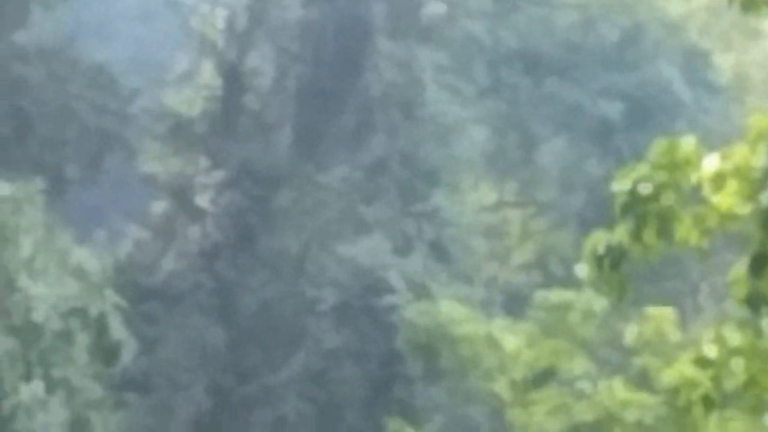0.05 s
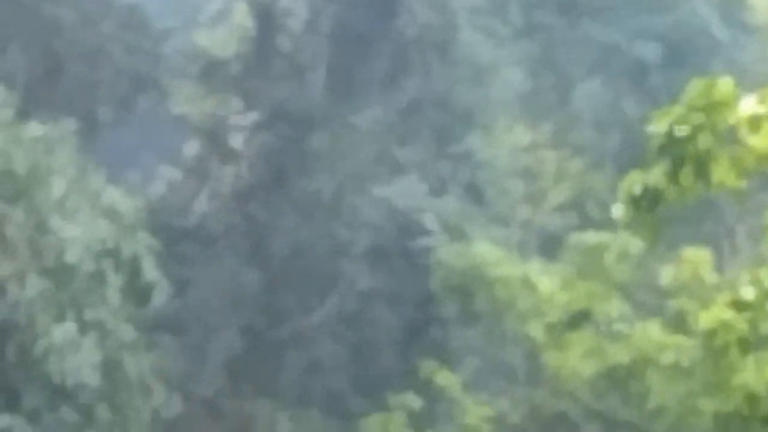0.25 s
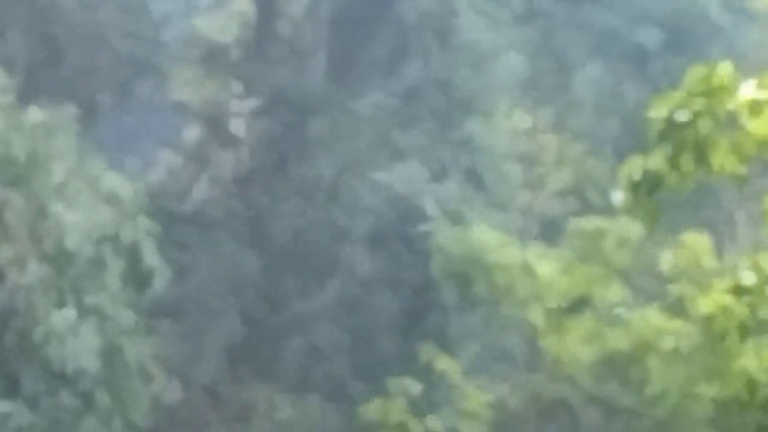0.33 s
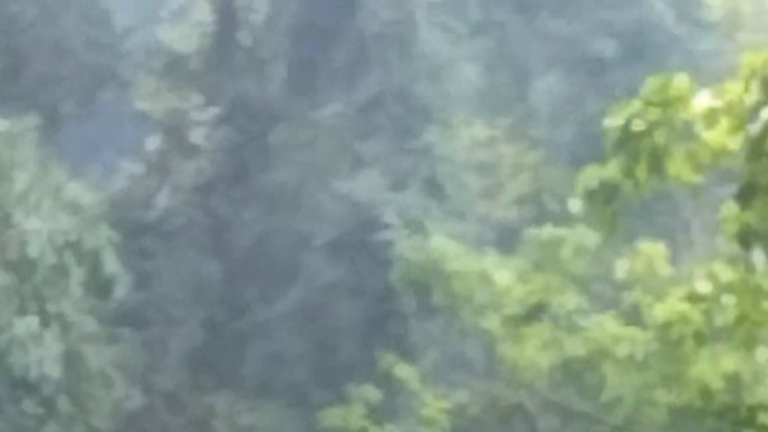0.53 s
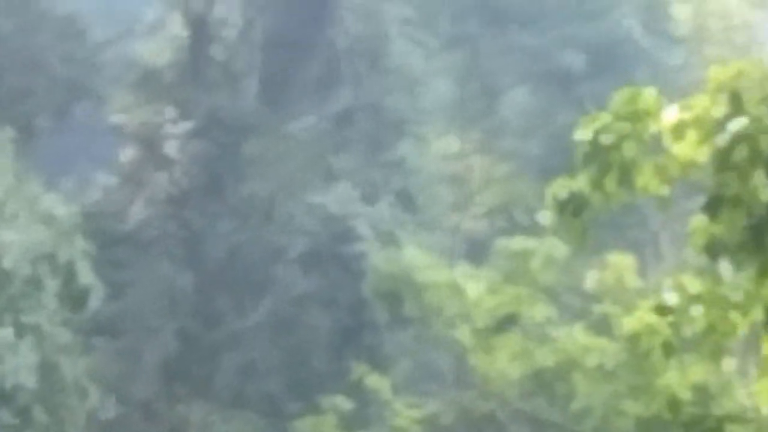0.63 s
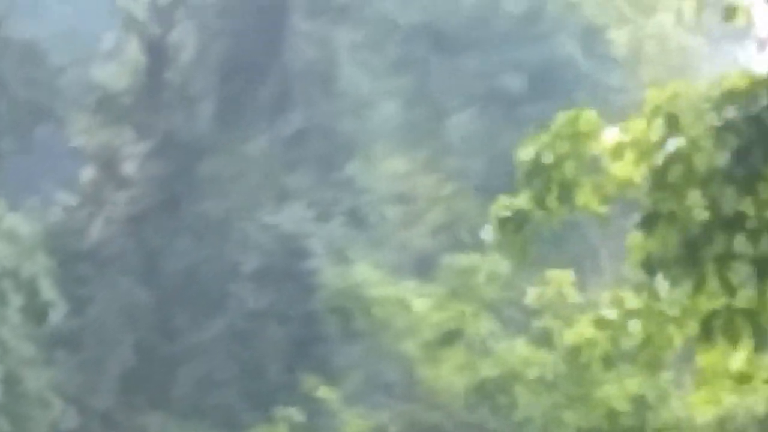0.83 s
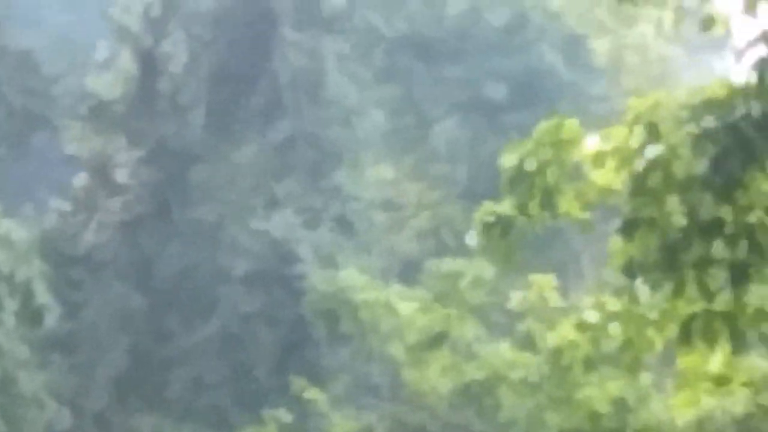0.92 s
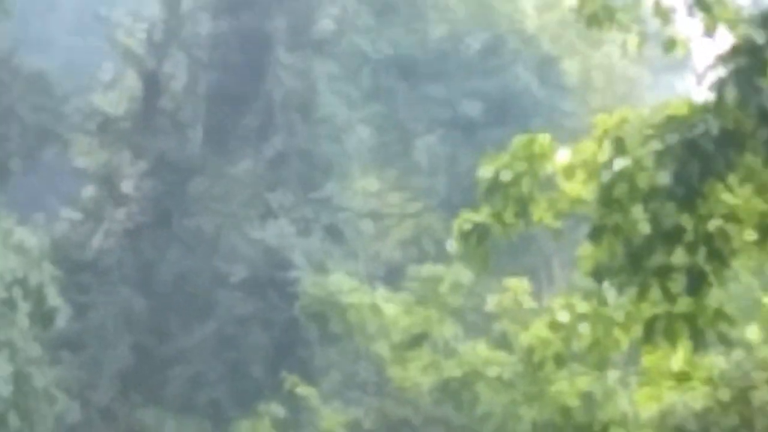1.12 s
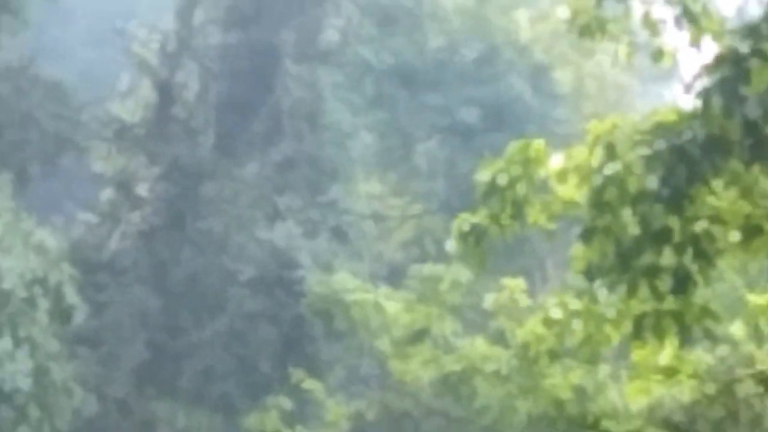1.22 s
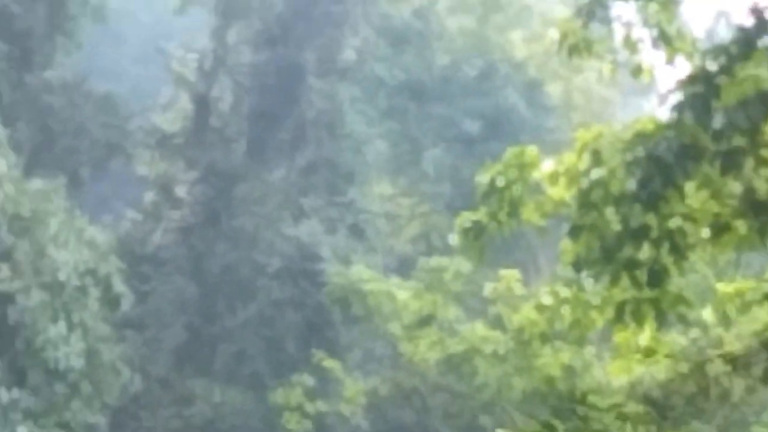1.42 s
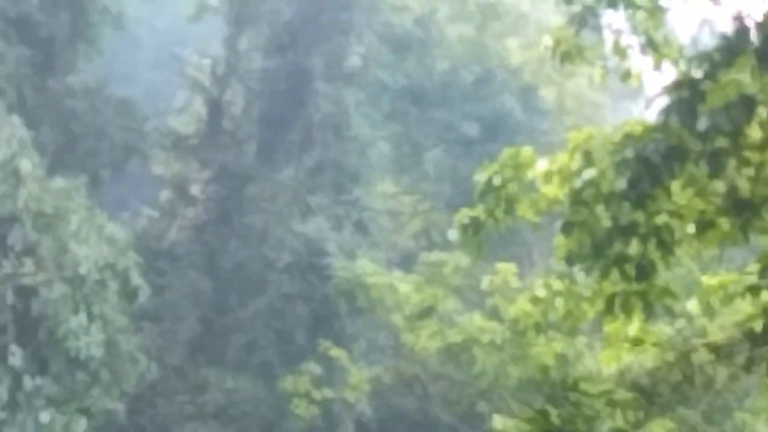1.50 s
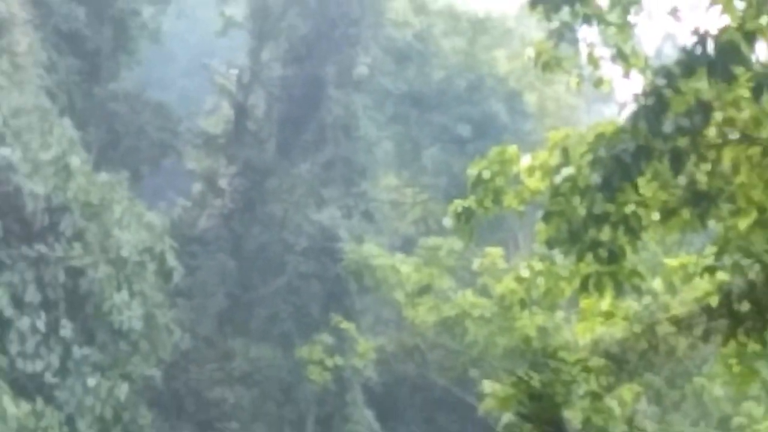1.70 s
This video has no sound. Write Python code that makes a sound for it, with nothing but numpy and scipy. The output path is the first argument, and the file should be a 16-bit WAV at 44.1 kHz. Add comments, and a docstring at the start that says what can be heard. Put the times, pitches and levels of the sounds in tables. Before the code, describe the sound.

One soft gibbon hoot rises among the trees, followed by two faint, thin bird chirps.

```python
"""A faint tick and rustle at the microphone, then a gibbon's soft, rising hoot from off in dense forest:
a nearly pure tone that echoes among the trunks, with a low knock under its start. Later a small bird
whistles two very high chirps from the trees to the right. Close by, all through, the hand-held camera
is rubbed in short strokes: friction gives a dry rustle, slips of the grip tick, and its body rumbles.
Still forest air lies behind it all, picked up by the camera's two microphones."""
import sys
import numpy as np
from scipy import signal
from scipy.fft import rfft, irfft
from scipy.io import wavfile
from scipy.ndimage import uniform_filter1d

SR = 44100
rng = np.random.default_rng(int(sys.argv[2]) if len(sys.argv) > 2 else 0)


def transcribe(u):
    """Save the signal u as a 16-bit wav file named by the first command-line argument.

    u: samples, shape (n,) or (channels, n), limited to [-1, 1]; the rate is SR.
    q: integer samples, one column per channel.
    """
    v = np.clip(np.atleast_2d(u).T, -1, 1)
    q = np.round(v * 32767).astype(np.int16)
    wavfile.write(sys.argv[1], SR, q)


N = 77175
T = np.arange(N) / SR
FREQS = np.fft.rfftfreq(N, 1 / SR)


# The hoot as it reaches the microphones through the trees, echoes included (time [s], level [dB])
HOOT_LEVEL = [(.08, -62.5), (.125, -35), (.15, -32), (.195, -36), (.215, -17.5), (.245, -22), (.3, -14),
              (.355, -11.5), (.39, -10), (.407, -19), (.432, -12), (.475, -20), (.51, -15.5), (.53, -21),
              (.545, -38.5), (.565, -27.5), (.615, -34.5), (.665, -43.5), (.715, -54.5), (.745, -39.5),
              (.79, -49.5), (.83, -61.5), (.88, -72)]
# Its octave, relative to the fundamental (time [s], level [dB])
OCTAVE_LEVEL = [(.12, -36.5), (.18, -22.5), (.225, -34.5), (.27, -45.5), (.34, -39), (.42, -34),
                (.55, -39.5)]

def gibbon_hoot():
    """Off in the trees, left: a slightly hoarse tone climbs and levels off; its echoes hang on."""
    start_s, top_s, voice_end_s = .072, .43, .54
    low_hz, top_hz, ceiling_hz, sag_hz_per_s = 277, 383.76, 386.5, 84
    climb_left = np.clip((top_s - T) / (top_s - start_s), 0, 1)
    hz = top_hz - (top_hz - low_hz) * climb_left ** 1.5 - sag_hz_per_s * np.clip(T - top_s, 0, .08)
    jitter = .006 * band(0, 120)
    echo_waver = .013 * (T > voice_end_s) * band(0, 90)  # overlapping echoes waver in pitch
    phase = 2 * np.pi * np.cumsum(hz * (1 + jitter + echo_waver)) / SR
    sounding = (T > HOOT_LEVEL[0][0]) & (T < HOOT_LEVEL[-1][0])
    level = uniform_filter1d(amp(curve(HOOT_LEVEL)) * sounding, size=400)
    lowpass = .5 - .5 * np.tanh((FREQS - ceiling_hz) / 9)
    fundamental = irfft(rfft(level * np.sin(phase)) * lowpass, N)
    octave = amp(curve(OCTAVE_LEVEL)) * np.sin(2 * phase + .25 * band(0, 120))
    hoarseness = amp(-33) * band(centre_hz=210, width_hz=70)
    hiss = amp(-37.5) * band(centre_hz=467, width_hz=440)
    voice = np.sqrt(2) * (fundamental + level * octave) + level * (hoarseness + hiss)
    return (voice + amp(-31) * forest_tail(voice, t60_s=.4, gap_s=.03)) * pan(4.8)


# The bird's two calls (time [s], level [dB], pitch factor [ratio])
CHIRPS = [(1.378, -39.5, 0.96), (1.428, -38, 0.95)]
# Contour that each call scales (time into the chirp [s], pitch [Hz], level [dB])
CHIRP_CONTOUR = [(0, 8060, -18), (.006, 9150, -13), (.013, 9700, -7), (0.025, 8800, -5.5),
                 (.036, 8490, -12.5), (0.047, 8260, -15)]
# Single reflections off trunks near the bird (delay [s], level [dB])
TRUNK_ECHOES = [(.0045, -10), (0.019, -18)]

def bird_chirps():
    """In the trees, right: thin whistles flick up and slide down; foliage scatters their lower part."""
    times, hz, db = np.transpose(CHIRP_CONTOUR)
    t = np.arange(0, times[-1], 1 / SR)
    phase = 2 * np.pi * np.cumsum(np.interp(t, times, hz)) / SR
    envelope = amp(np.interp(t, times, db)) * signal.windows.tukey(len(t), .1)
    direct = np.zeros(N)
    for start_s, level_db, ratio in CHIRPS:
        add(direct, start_s, np.sqrt(2) * amp(level_db) * envelope * np.sin(ratio * phase))
    dulled = signal.sosfilt(signal.butter(12, 8860, fs=SR, output="sos"), direct)
    out = direct + amp(4.5) * forest_tail(dulled, t60_s=.23, gap_s=.0093)
    for delay_s, echo_db in TRUNK_ECHOES:
        add(out, delay_s, amp(echo_db) * direct)
    return out * pan(-8)


def friction():
    """Hand on the camera: two noises, uneven in patches of time and pitch, flickering in level."""
    spectra = signal.stft(rng.standard_normal((2, N)), nperseg=256)[2]
    patches = uniform_filter1d(rng.standard_normal(spectra.shape[1:]), size=5, axis=0)
    patches = unit(uniform_filter1d(patches, size=7, axis=1))
    flicker = unit(uniform_filter1d(rng.standard_normal(spectra.shape[2]), size=2))
    return unit(signal.istft(spectra * amp(3.5 * patches + 1.46 * flicker), nperseg=256)[1][:, :N])


def tiny_slips(per_s=400, spread_db=4, t60_s=.018):
    """Hand on the camera: two streams of random slips, each a quickly dying grain of noise."""
    impulses = (rng.random((2, N)) < per_s / SR) * rng.choice([-1, 1], (2, N))
    strength = amp(spread_db * np.minimum(rng.exponential(1, (2, N)), 4))
    grain = rng.standard_normal(2048) * amp(-60 * T[:2048] / t60_s)
    return unit(signal.fftconvolve(impulses * strength, grain[None])[:, :N])


# Strokes of the hand, shaping rustle and rumble together (time [s], level [dB])
STROKE_LEVEL = [(0, -61.5), (.018, -51), (.048, -61), (.11, -56.5), (.174, -52), (.232, -53.5),
                (.262, -49.5), (.31, -48), (.36, -55), (.424, -52), (.438, -51.5), (.46, -53), (.6, -55.5),
                (.716, -56.5), (.77, -50.5), (.83, -57), (.855, -52), (.885, -73), (.908, -77),
                (.94, -48.5), (.97, -46.5), (.988, -51.5), (1.02, -77.5), (1.048, -83.5), (1.062, -59),
                (1.085, -53.5), (1.105, -62), (1.13, -75), (1.17, -67), (1.182, -52), (1.208, -70),
                (1.225, -67), (1.25, -54.5), (1.29, -58), (1.41, -53), (1.48, -50.5), (1.584, -62),
                (1.628, -52.5), (1.651, -71.5), (1.668, -58), (1.695, -52.5), (1.75, -54)]
# Colour of the rustle (frequency [Hz], level [dB])
RUSTLE_SPECTRUM = [(100, -3.5), (380, -4.5), (580, 6), (770, -15.5), (930, 1), (1060, -9), (1200, 3),
                   (1350, -2.5), (1550, -6), (1900, 2), (2060, 7.5), (2250, 0), (2600, -3), (3100, -1.5),
                   (3800, -8.5), (5200, -6.5), (6500, -10.5), (9300, -12.5), (11200, -15.5), (12300, -26.5),
                   (16000, -25)]
# Lift or cut of the rustle's treble (time [s], level [dB])
TREBLE_LEVEL = [(0, -2), (.3, -2), (.5, 2), (.8, -1.5), (1.0, -1.5), (1.2, -0.5), (1.25, -8), (1.36, -4),
                (1.45, 5), (1.6, 3.5), (1.75, -2)]
# Colour of the camera body's rumble (frequency [Hz], level [dB])
RUMBLE_SPECTRUM = [(20, -39), (40, -34.5), (58, -5), (70, -13.5), (87, 2.5), (102, -16), (160, -11.5),
                   (225, -13.5), (290, -17), (450, -24.5), (800, -40.5), (2000, -79.5)]
# Lift or cut of the rumble within the strokes (time [s], level [dB])
RUMBLE_LEVEL = [(0, 0), (.1, 7), (.19, 12.5), (.3, 5), (.45, 10.5), (.6, 15.5), (.73, 7.5), (.81, 9.5),
                (.9, 1), (.96, -2), (1.08, 4.5), (1.19, 7.5), (1.27, 11), (1.35, 9.5), (1.45, 4.5),
                (1.55, 7), (1.62, 6), (1.69, 7.5), (1.75, -3)]

def camera_rubbing():
    """Right at the microphones: friction and slips rustle; the body rumbles under the same strokes."""
    rustle = amp(.5) * at_microphones(friction() + amp(-3.5) * tiny_slips(), RUSTLE_SPECTRUM)
    treble = signal.sosfiltfilt(signal.butter(4, 5930, "high", fs=SR, output="sos"), rustle)
    rustle += (amp(curve(TREBLE_LEVEL)) - 1) * treble
    rumble = at_microphones(rng.standard_normal((2, N)), RUMBLE_SPECTRUM)
    rumble *= amp(curve(RUMBLE_LEVEL) - .5)
    return (rustle + rumble) * amp(curve(STROKE_LEVEL))


# Small ticks of the grip (time [s], relative level [dB], ring pitch [Hz])
GRIP_TICKS = [(.004, -39.5, 2030), (.012, -44.5, 956), (0.297, -42, 2926), (0.434, -40.5, 1780),
              (0.436, -36.5, 1023), (0.486, -43, 3000), (0.648, -45, 4800), (0.733, -35.5, 3290),
              (.763, -32, 3124), (.7684, -41, 5560), (0.844, -42, 5400), (0.922, -57, 5460),
              (0.954, -45.5, 861), (0.963, -36, 5100), (1.081, -45.5, 5400), (1.149, -61, 2000),
              (1.177, -51, 2034), (1.254, -40.5, 4710), (1.326, -45.5, 3260), (1.361, -43.5, 2330),
              (1.473, -40, 5400), (1.521, -44, 5630), (1.666, -42.5, 4880)]

def grip_ticks(rise_s=.001, t60_s=.06):
    """Close, mostly in the left microphone: each larger slip gives a snap and a short, rough ring."""
    out, t = np.zeros(N), T[:4096]
    envelope = np.minimum(t / rise_s, 1) * amp(-60 * t / t60_s)
    for start_s, db, hz in GRIP_TICKS:
        roughness = .88 * band(0, 500, len(t))
        ring = np.sqrt(2) * np.sin(2 * np.pi * hz * t + roughness)
        snap = amp(-10) * band(hz, 2 * hz, len(t))
        add(out, start_s, amp(db - 6) * envelope * (ring + snap))
    return out * pan(11)


# Short scuffs on the camera (time [s], length [s], level [dB], resonance [Hz])
BODY_SCUFFS = [(.945, .035, -56.5, 517), (1.171, 0.035, -57.5, 576), (1.319, 0.027, -51.5, 310),
               (1.382, 0.041, -59, 925), (1.384, 0.042, -54.5, 1270)]

def body_scuffs():
    """Close, left: each brief swell of friction excites one resonance of the camera body."""
    out = np.zeros(N)
    for start_s, length_s, db, hz in BODY_SCUFFS:
        swell = signal.windows.tukey(round(length_s * SR), .5)
        resonance = band(hz, width_hz=156, size=8192)[:len(swell)]
        add(out, start_s, amp(db) * swell * resonance)
    return out * pan(9)


def low_knock(start_s=.134, hz=218, rise_s=.0077, t60_s=.25):
    """Dead centre, under the start of the hoot: one low mode, softly struck."""
    t = np.maximum(T - start_s, 0)
    envelope = np.minimum(t / rise_s, 1) * amp(-27.5 - 60 * t / t60_s)
    return envelope * np.sin(2 * np.pi * hz * t)


# Colour of the still air under the trees (frequency [Hz], level [dB])
AIR_SPECTRUM = [(30, -9.5), (90, 5.5), (400, -10), (1000, -29.5), (5000, -14), (10000, -30.5),
                (16000, -35.5)]

def forest_air():
    """All around the microphones: a very faint, steady, low hush."""
    return amp(-78.5) * at_microphones(rng.standard_normal((2, N)), AIR_SPECTRUM)


def forest_tail(sound, t60_s, gap_s):
    """Trunks and leaves scatter a sound into a dying tail, different at each microphone."""
    tail = rng.standard_normal((2, N)) * amp(-60 * T / t60_s) * (T > gap_s)
    tail /= np.linalg.norm(tail, axis=1)[:, None]
    return signal.fftconvolve(sound[None], tail, axes=1)[:, :N]


# How alike the two microphones sound (frequency [Hz], coherence [0-1])
MIC_COHERENCE = [(60, 1), (150, 0.78), (300, 0.85), (700, 0.4), (2000, 0.66), (4000, 0.43), (8000, 0.094),
                 (15000, .1)]
# Left microphone over right (frequency [Hz], level [dB])
MIC_BALANCE = [(60, -1), (110, 3), (200, 3.0), (380, 0.5), (700, 5), (1290, 4), (2380, 3), (4400, 11.5),
               (8120, 1.0), (15000, -4.5)]
# Left microphone ahead of right (frequency [Hz], phase [rad])
MIC_LEAD = [(20, 0), (750, 0.5), (1300, 1.5), (1900, 3.5), (2400, 3.5), (3100, 5), (4300, 7.5), (15000, 5)]

def at_microphones(pair, spectrum):
    """Colours two unrelated signals and spreads them over the microphones; their mean has rms 1."""
    left, unrelated = rfft(pair)
    coherence = over_frequency(MIC_COHERENCE)
    right = coherence * left + np.sqrt(1 - coherence ** 2) * unrelated
    right *= np.exp(-1j * over_frequency(MIC_LEAD))
    gains = pan(over_frequency(MIC_BALANCE)) * amp(over_frequency(spectrum))
    out = irfft(np.array([left, right]) * gains, N)
    return out / np.sqrt(np.mean(out.mean(0) ** 2))


def amp(db):
    """Decibels to gain."""
    return 10 ** (np.asarray(db) / 20)


def unit(x):
    """Scales to rms 1."""
    return x / np.sqrt(np.mean(x ** 2) + 1e-20)


def curve(points):
    """Joins (time [s], value) points by straight lines."""
    return np.interp(T, *np.transpose(points))


def over_frequency(points):
    """Joins (frequency [Hz], value) points on a log-frequency axis."""
    hz, value = np.transpose(points)
    return np.interp(np.log(FREQS + 1), np.log(hz + 1), value)


def pan(left_over_right_db):
    """Left and right gains with a mean of 1."""
    left = amp(np.atleast_1d(left_over_right_db))
    gains = np.array([left, np.ones_like(left)])
    return gains / gains.mean(0)


def add(mix, start_s, sound):
    """Adds a sound into the mix at a time."""
    part = mix[..., max(0, round(start_s * SR)):][..., :sound.shape[-1]]
    part += sound[..., :part.shape[-1]]


def band(centre_hz, width_hz, size=N):
    """Noise in one resonance, at rms 1; centred on 0 Hz it is a random waver."""
    hz = np.fft.rfftfreq(size, 1 / SR)
    response = 1 / (1 + ((hz - centre_hz) / width_hz * 2) ** 4)
    return unit(irfft(rfft(rng.standard_normal(size)) * response, size))


def scene():
    """Gibbon and bird out in the trees, handling at the microphones, quiet forest air behind."""
    air = forest_air()
    calls = gibbon_hoot() + bird_chirps()
    handling = camera_rubbing() + grip_ticks() + body_scuffs()
    return calls + handling + low_knock() + air


def record(dry, edge_hz=15800):
    """The camera's recorder cuts off the highest treble."""
    lowpass = signal.firwin(511, edge_hz, window=("kaiser", 9), fs=SR)
    return signal.oaconvolve(dry, lowpass[None], "same")


dry = scene()
out = record(dry)
transcribe(out)
```